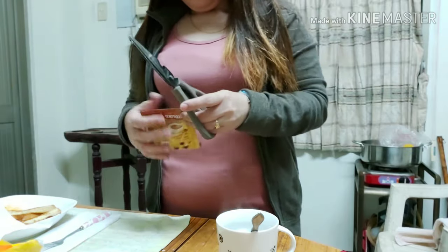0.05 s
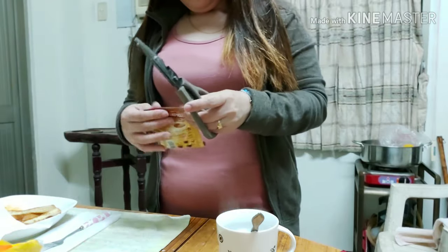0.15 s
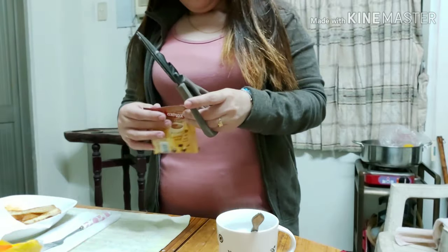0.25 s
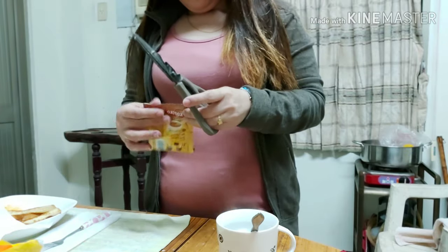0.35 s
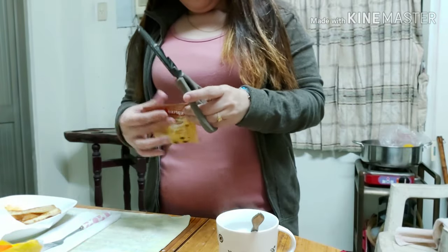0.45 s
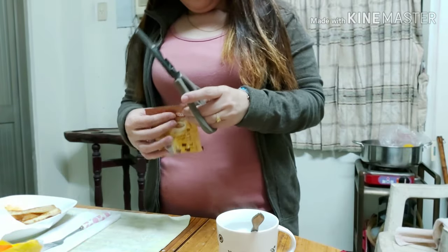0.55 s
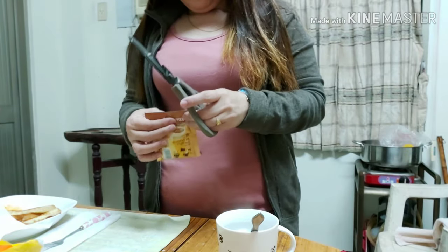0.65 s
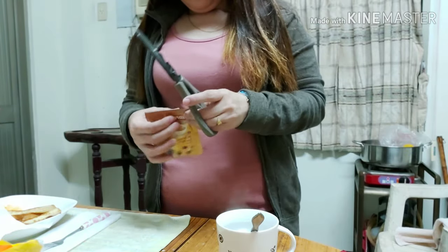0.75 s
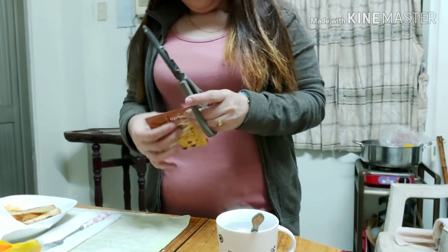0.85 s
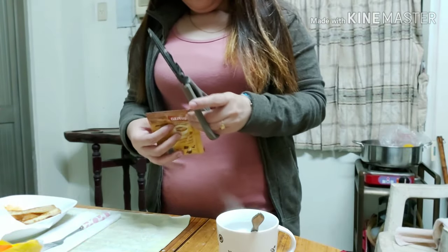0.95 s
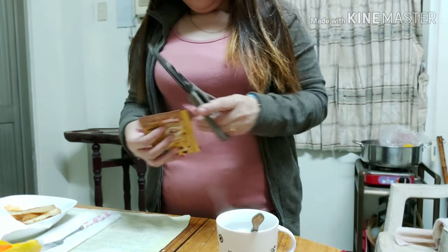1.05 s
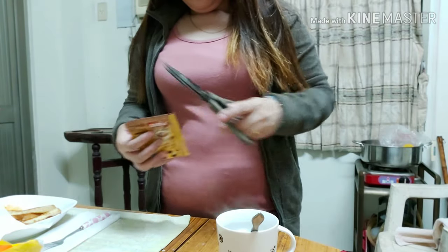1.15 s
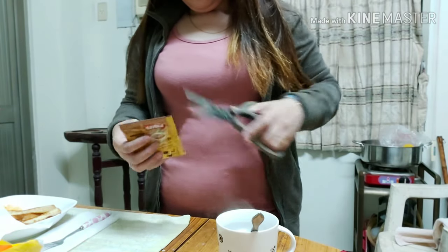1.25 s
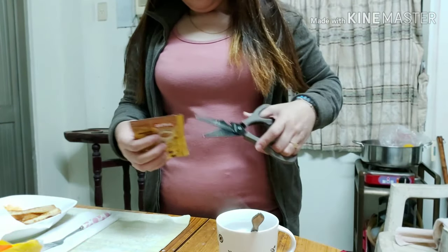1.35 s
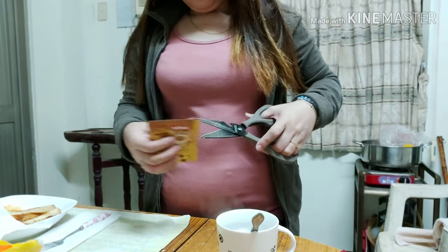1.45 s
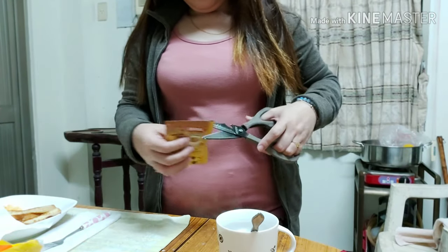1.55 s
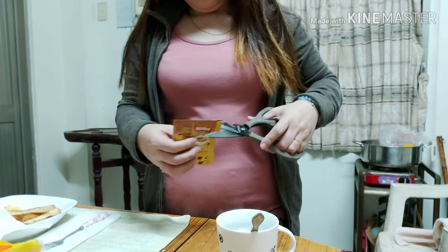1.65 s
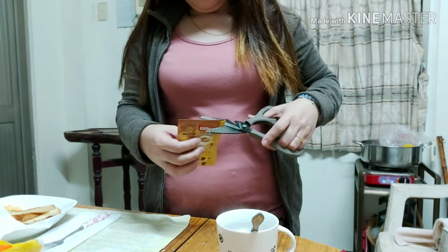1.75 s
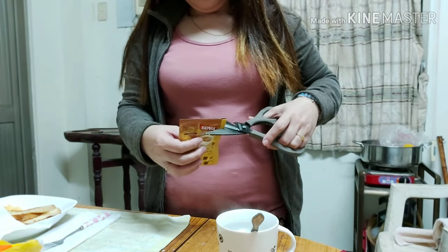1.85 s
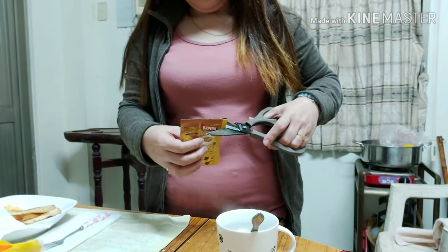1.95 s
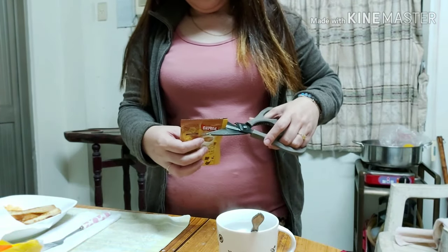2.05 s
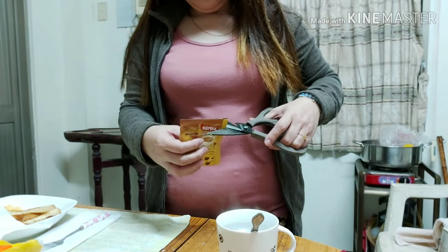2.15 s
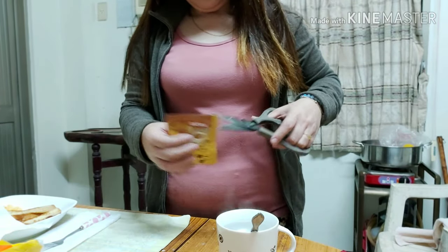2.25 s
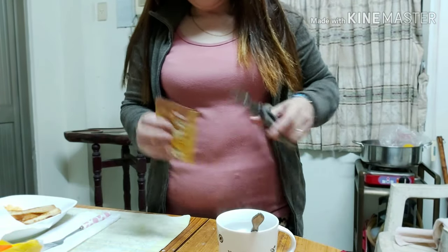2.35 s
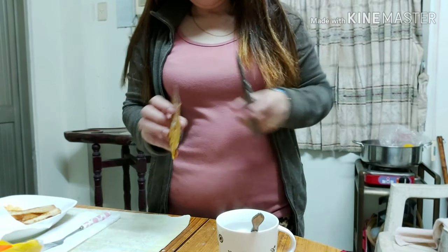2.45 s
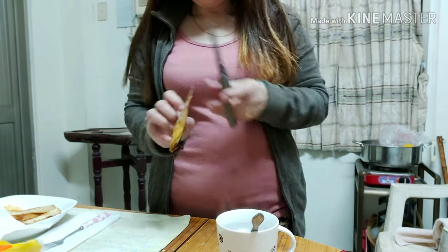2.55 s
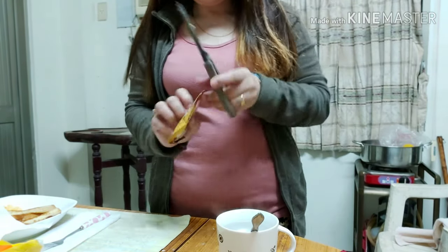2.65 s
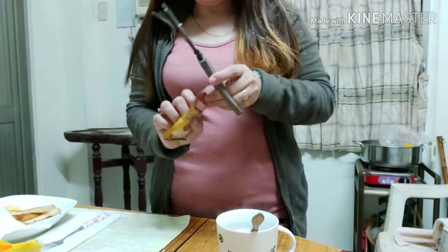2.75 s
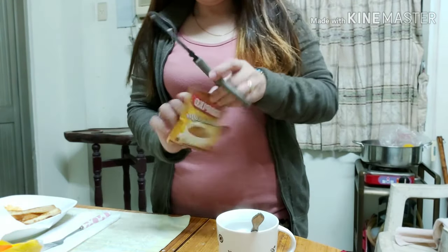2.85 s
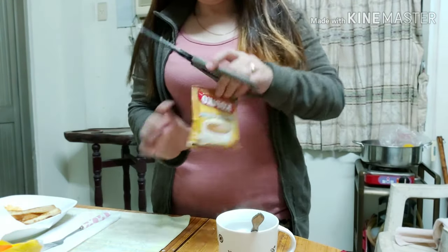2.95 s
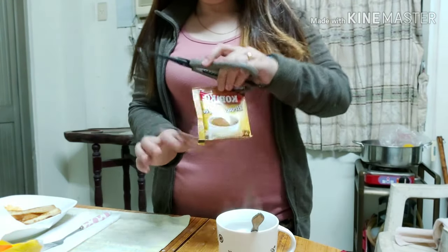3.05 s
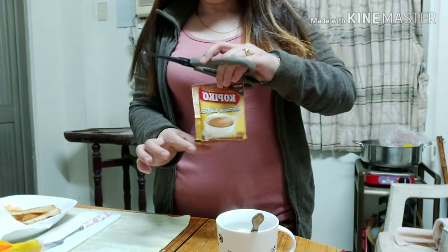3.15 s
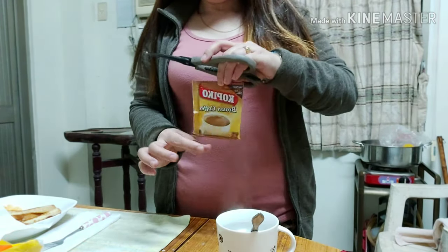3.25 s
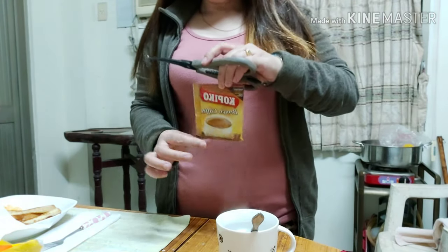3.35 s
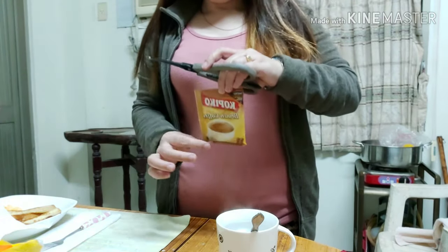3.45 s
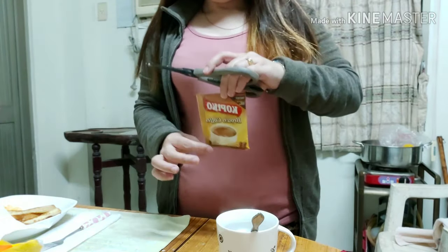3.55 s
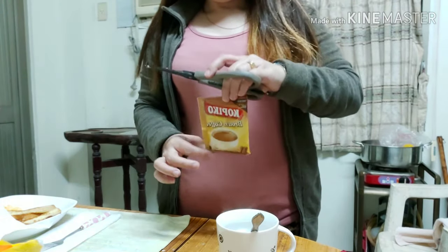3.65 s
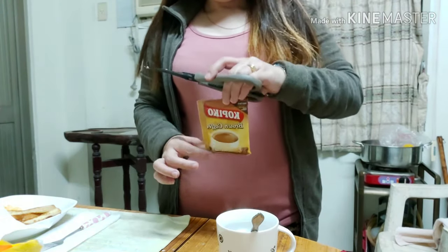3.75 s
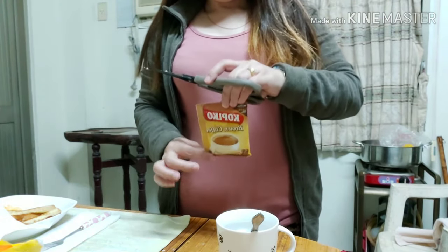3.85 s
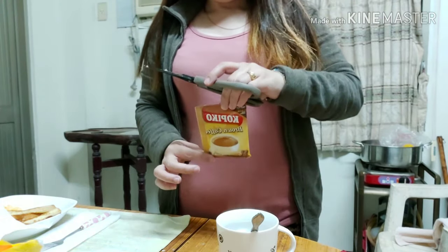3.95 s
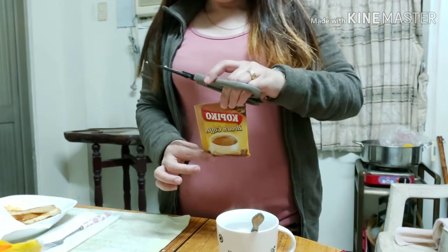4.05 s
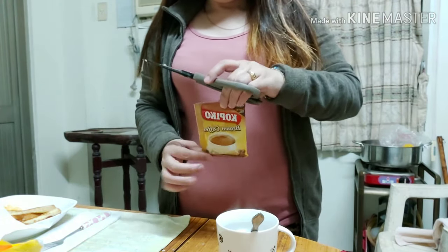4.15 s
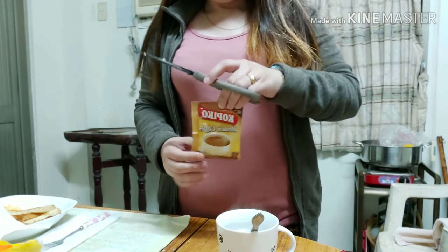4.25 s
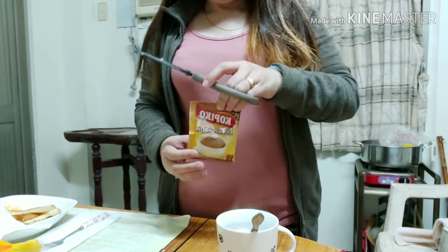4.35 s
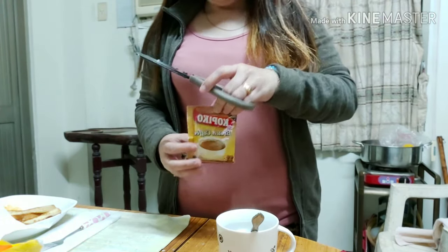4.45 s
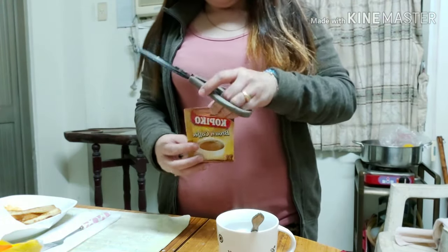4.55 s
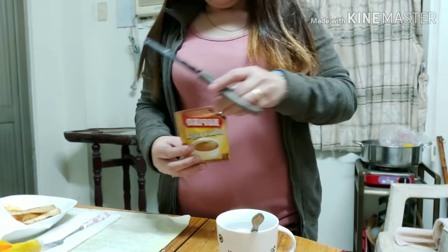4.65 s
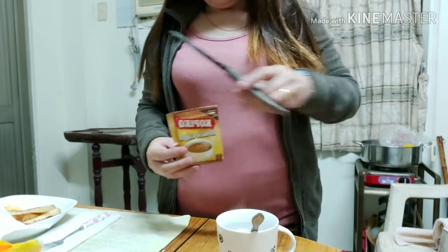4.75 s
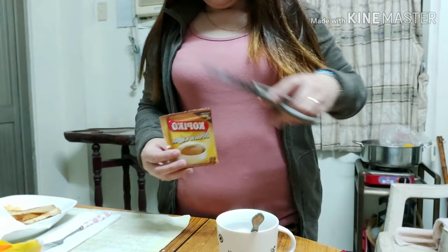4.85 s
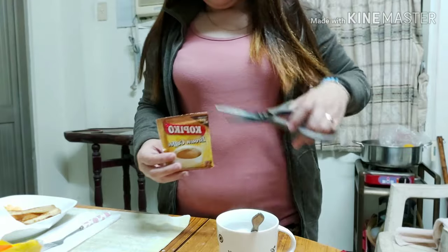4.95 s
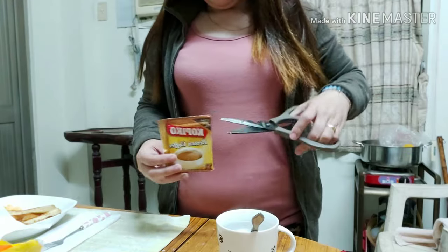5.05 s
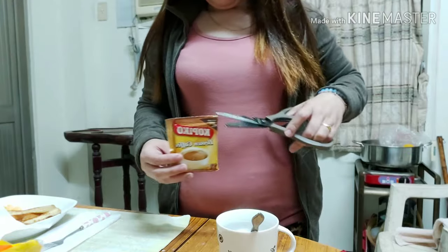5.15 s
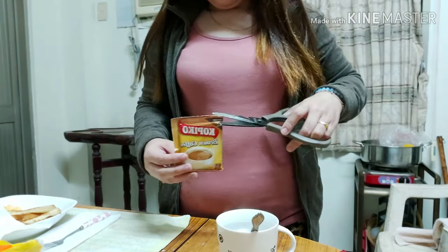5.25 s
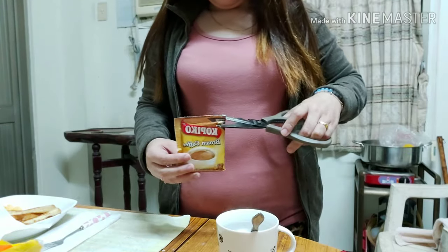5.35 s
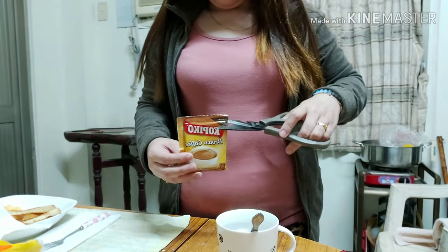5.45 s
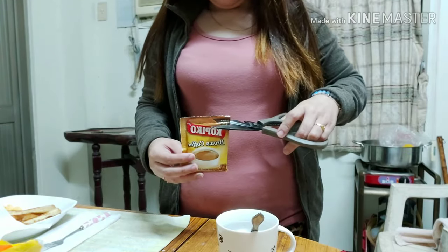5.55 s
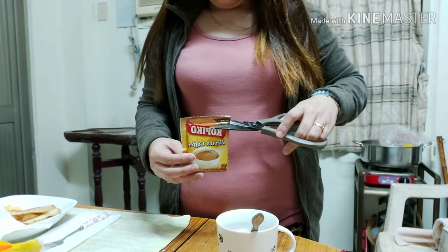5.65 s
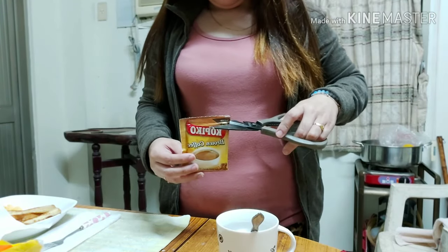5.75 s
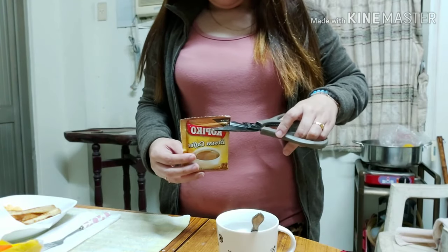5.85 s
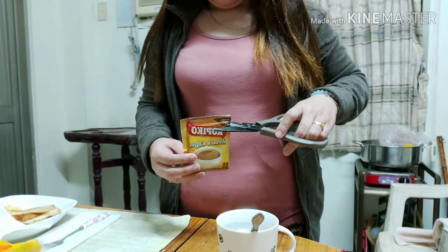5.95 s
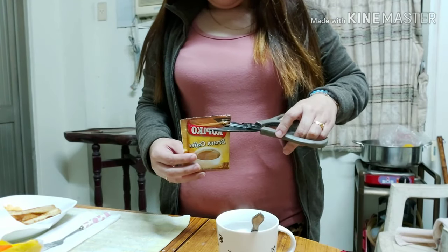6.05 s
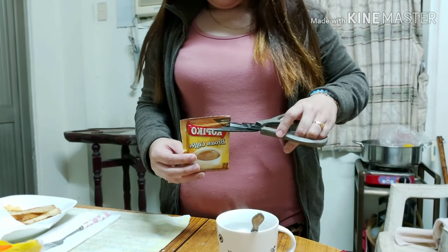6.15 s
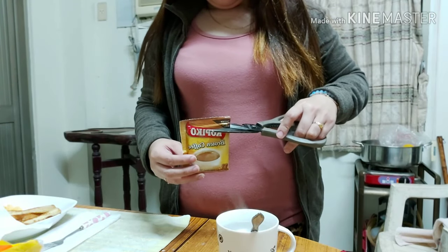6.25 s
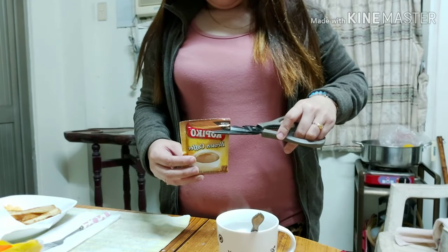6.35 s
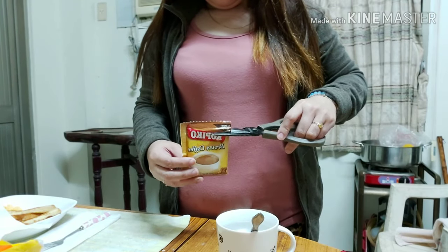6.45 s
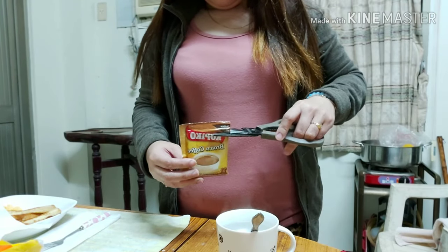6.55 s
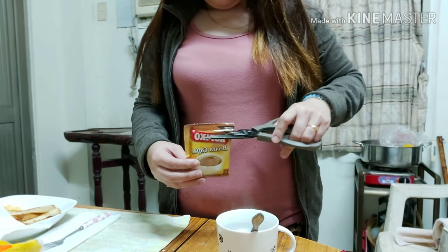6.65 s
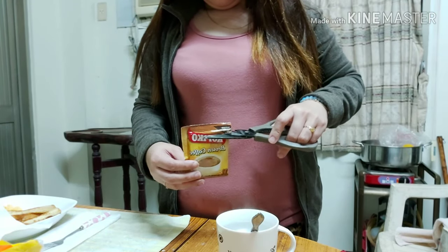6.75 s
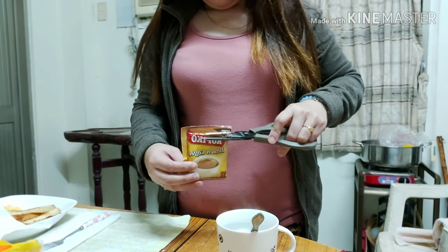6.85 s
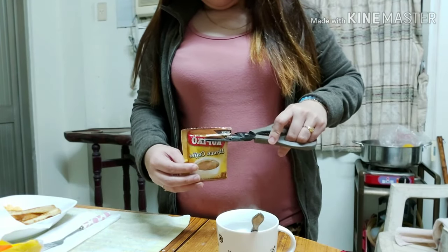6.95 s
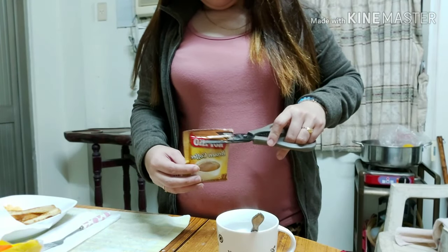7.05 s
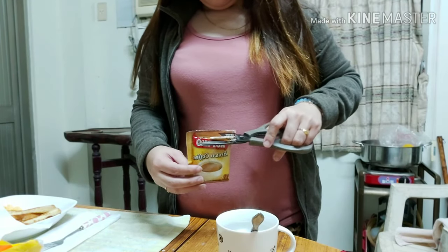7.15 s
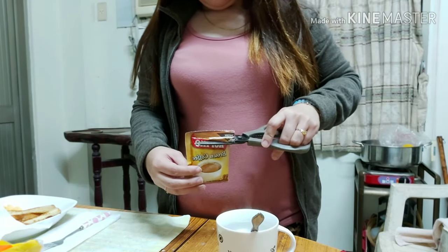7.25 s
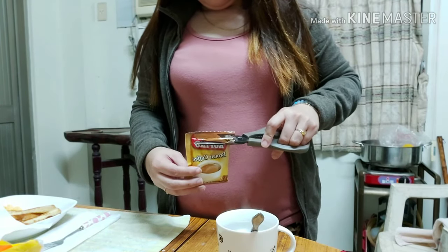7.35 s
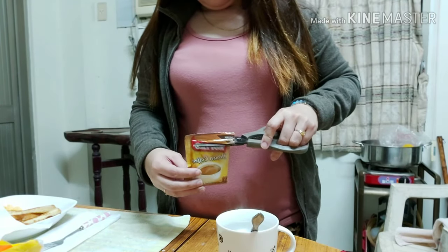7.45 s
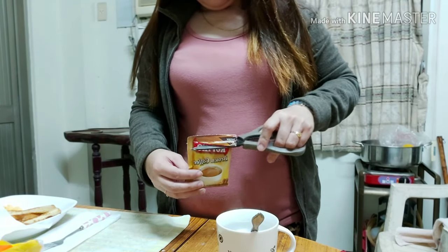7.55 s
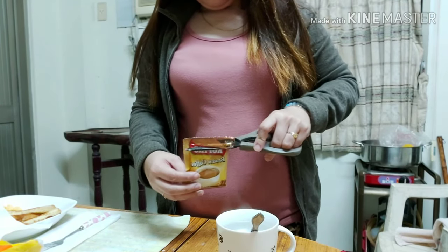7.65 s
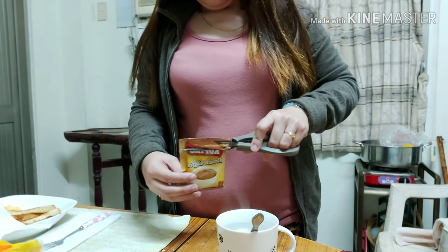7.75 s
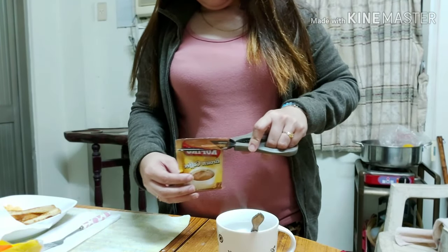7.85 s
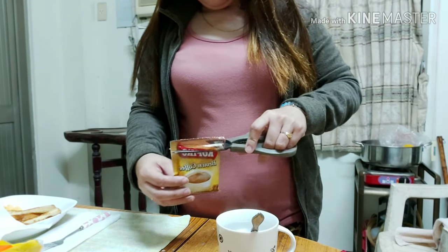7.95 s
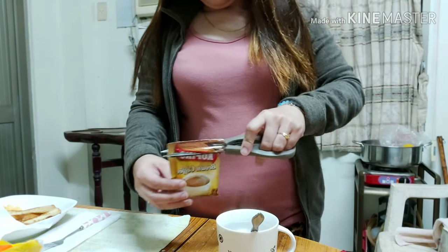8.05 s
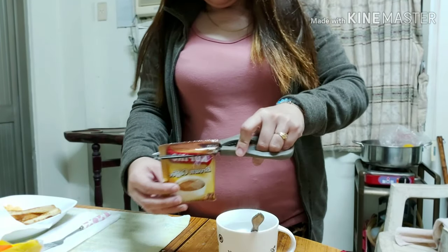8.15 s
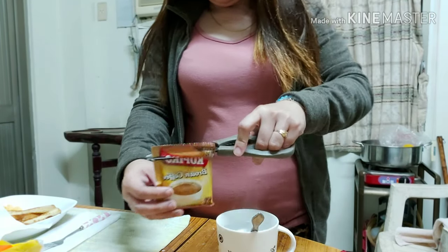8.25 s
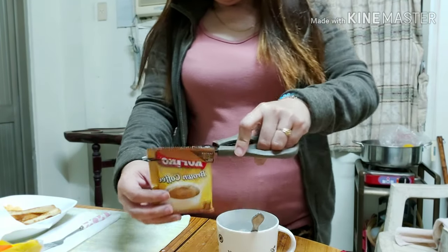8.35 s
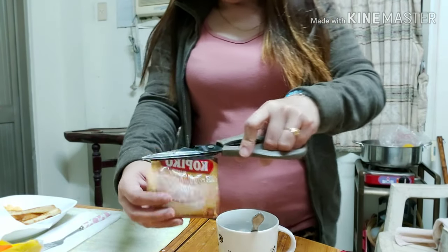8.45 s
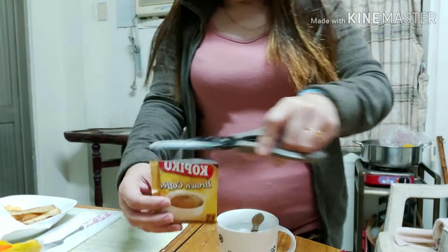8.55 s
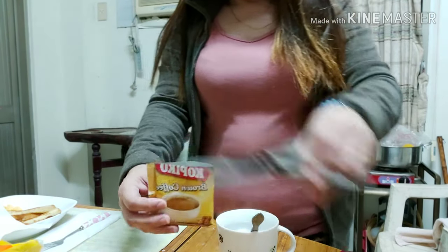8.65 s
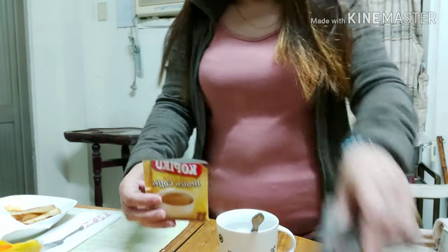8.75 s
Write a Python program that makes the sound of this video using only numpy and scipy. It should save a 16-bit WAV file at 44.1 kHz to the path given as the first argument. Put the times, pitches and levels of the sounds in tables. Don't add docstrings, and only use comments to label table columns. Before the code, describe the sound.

Sharp foil crackles, short pauses, then crisp snipping of a small powder pouch end in a bright scissors clack, with soft rhythmic appliance puffs behind.

```python
import sys
import numpy as np
from scipy import signal
from scipy.io import wavfile
from scipy.ndimage import uniform_filter1d

SR = 44100
rng = np.random.default_rng(int(sys.argv[2]) if len(sys.argv) > 2 else 0)


def dump_mix(stems):
    frames = np.atleast_2d(stems).T
    limited = np.clip(frames, -1, 1)
    pcm = np.round(limited * 32767).astype(np.int16)
    wavfile.write(sys.argv[1], SR, pcm)


def decibels_to_gain(level_db):
    exponent = np.asarray(level_db, float) / 20
    return 10 ** exponent


N = 387373
TIME = np.arange(N) / SR


def evened(x):
    return x / np.sqrt(np.mean(x ** 2) + 1e-20)


def read(points, hz):
    f, value = np.transpose(points)
    return np.interp(np.log(hz + 1), np.log(f + 1), value)


def causal(db):
    return np.exp(np.conj(signal.hilbert(np.log(decibels_to_gain(np.maximum(db, -80))))))


def coloured(x, points):
    hz = abs(np.fft.fftfreq(2 ** 11, 1 / SR))
    taps = np.fft.ifft(causal(read(points, hz))).real[:2 ** 10]
    return signal.oaconvolve(x, taps)[:len(x)]


def add(mix, s, sound):
    part = mix[..., round(s * SR):][..., :sound.shape[-1]]
    part += sound[..., :part.shape[-1]]


def burst(t, rise_s, fall_s):
    return (1 - np.exp(-t / rise_s)) ** 2 * np.exp(-t / fall_s)


# freq_hz, likeness
LIKENESS = [(40, 0.53), (150, 0.79), (300, 0.73), (640, 0.039), (1400, -0.14), (3000, -0.043)]


def second_port(first, other, hz):
    same = np.clip(read(LIKENESS, hz), -1, 1)[:, None]
    return same * first + np.sqrt(1 - same ** 2) * other


def diffuse(shape_db, patchy_db):
    frames, hz = N // 256 + 5, np.fft.rfftfreq(1024, 1 / SR)
    a, b, c, d, patches = rng.standard_normal((frames, 513, 5)).T
    patches = uniform_filter1d(patches, size=10, axis=0)
    patches = evened(uniform_filter1d(patches, size=8, axis=1))
    left = a + 1j * b
    z = np.array([left, second_port(left, c + 1j * d, hz)])
    z *= decibels_to_gain(shape_db(hz)[:, None] + patchy_db * patches)
    return evened(signal.istft(z, nperseg=1024, noverlap=768)[1][:, :N])


# freq_hz, level_db per Hz
HUM_BED = [(25, 4.5), (60, -13), (170, -2.5), (310, -1), (430, -13), (1400, -22.5), (10000, -37),
           (15000, -30.5)]
# freq_hz, width_hz, level_db
HUM_MODES = [(102.4, 9.6, -74.5), (174.5, 14.3, -67.5), (294.1, 9, -73)]


def hum(bed_db=-63, swing=0.45):
    bed = decibels_to_gain(bed_db) * diffuse(lambda hz: read(HUM_BED, hz), patchy_db=1.5)
    for (hz, width_hz, db), chance in zip(HUM_MODES, rng.standard_normal((len(HUM_MODES), 3, N))):
        r, turn = np.exp(-np.pi * width_hz / SR), np.exp(2j * np.pi * hz * TIME)
        drive = (chance[0] + 0.12 * chance[1:]) / turn
        slow = signal.lfilter([1 - r], [1, -2 * r, r * r], drive)
        mode = abs(slow) ** swing * np.exp(1j * np.angle(slow)) * turn
        bed += decibels_to_gain(db) * evened(mode.real)
    return bed


# freq_hz, level_db per Hz
PUFF_AIR = [(500, -29.5), (900, -11.5), (2000, -12.5), (3100, -13.5), (5000, -14), (11000, -11),
            (14800, -9.5), (16000, -21.5)]
# freq_hz, width_hz, lift_db
PUFF_MODES = [(1110, 300, 8.5), (1880, 36, 21), (2163, 140, 16), (3920, 630, 13), (6370, 3460, 12),
              (10000, 310, 3), (13000, 1300, 2), (6290, 500, 4), (3340, 330, -7), (10500, 900, -2)]
# period_share, level_db
STROKE = [(0, -93), (.07, -62), (.15, -58), (.37, -62), (.49, -60.5), (.72, -67), (.9, -75), (1, -72)]
# start_s, strength_db, delay_s
LOAD = [
    (0, 1, 0.029),
    (1.6, -2, 0.064),
    (2.3, -1, 0.027),
    (3.75, 7, 0.0078),
    (4.15, 4, 0.035),
    (4.85, -3, -0.013),
    (5.201, 0.5, 0.0028),
    (5.561, 2, 0.013),
    (5.95, 1.5, -0.0061),
    (8.78, 3, -0.028),
]


def housing_db(hz):
    modes_db = sum(db / (1 + (2 * (hz - f) / width_hz) ** 2) for f, width_hz, db in PUFF_MODES)
    return read(PUFF_AIR, hz) + modes_db


def lowpass(x, cutoff_hz):
    taps = signal.firwin(numtaps=2 ** 6 + 1, cutoff=cutoff_hz, fs=SR)
    return signal.oaconvolve(x, taps[None], "same", axes=1)


def puffs(stroke_s=5.165, period_s=0.3665):
    treble_hz, treble_lead_s = 5050, 0.023
    fizz_hz, fizz_lag_s, gap_share, gap_depth_db = 8200, 0.005, 0.41, -5
    share, db = np.transpose(STROKE)
    s, strength_db, late_s = np.transpose(LOAD)
    phase = (TIME - stroke_s - np.interp(TIME, s, late_s)) / period_s
    air = diffuse(housing_db, patchy_db=-1.0) * decibels_to_gain(np.interp(TIME, s, strength_db))
    body, below = lowpass(air, treble_hz), lowpass(air, fizz_hz)
    body_db = np.interp(phase % 1, share, db)
    treble_db = np.interp((phase + treble_lead_s / period_s) % 1, share, db)
    fizz_db = np.interp((phase - fizz_lag_s / period_s) % 1, share, db)
    fizz_db += gap_depth_db * np.exp(-((phase % 1 - gap_share) / 0.065) ** 2)
    return body * decibels_to_gain(body_db) + (below - body) * decibels_to_gain(treble_db) + (air - below) * decibels_to_gain(fizz_db)


# middle_s, length_s, crackle_db, handling_db
SQUEEZES = [(0.01, 0.079, -48.5, -57), (0.315, 0.2, -47.5, -50.5), (0.512, 0.1, -40.5, -53.5),
            (0.682, 0.09, -30.5, -46.5), (0.902, 0.52, -47.5, -53), (1.1, 0.1, -38, -65),
            (1.314, 0.12, -48, -85), (2.553, 0.086, -44, -68), (2.653, 0.093, -42, -56.5),
            (2.868, 0.19, -36.5, -64), (2.96, 0.21, -41.5, -50.5), (3.415, 0.2, -48, -57),
            (3.484, 0.081, -42, -58), (4.562, 0.31, -65, -63.5), (4.686, 0.12, -48, -65),
            (6.424, 0.14, -57.5, -53), (6.506, 0.23, -43, -63), (6.715, 0.089, -38, -55.5),
            (6.99, 0.23, -44.5, -56), (7.193, 0.064, -45, -47.5), (7.424, 0.097, -50, -53),
            (7.617, 0.1, -49, -58.5), (7.799, 0.17, -39.5, -53), (7.89, .1, -58, -74),
            (8.11, 0.17, -48.5, -59), (8.28, 0.14, -46.5, -60.5), (8.486, 0.058, -44.5, -52),
            (8.758, 0.21, -54, -66)]


def effort_db(column, edge_db=-5.5, release=0.81):
    table, t = np.array(SQUEEZES), TIME[::2 ** 6]
    off = 2 * (t - table[:, :1]) / table[:, 1:2]
    off = np.where(off > 0, off / release, off)
    level_db = table[:, column:column + 1] + edge_db * off ** 2
    power = (decibels_to_gain(level_db) ** 2).sum(0)
    return np.interp(TIME, t, 10 * np.log10(power + 1e-12))


def random_hits(per_s, spread_db, most):
    size = decibels_to_gain(spread_db * np.minimum(rng.exponential(1, N), most))
    return size * (rng.random(N) < per_s / SR)


# freq_hz, level_db per Hz
FOIL = [(530, -22.5), (900, 4.5), (1770, 2), (4200, 4), (6400, -3.5), (12000, -5), (15100, -46),
        (16000, -46)]


def crackle(per_s=350, spread_db=3.0):
    size = random_hits(per_s, spread_db, 1.6)
    kind, t, out = rng.integers(0, 16, N), np.arange(2 ** 8) / SR, np.zeros((2, N))
    for k, chance in enumerate(rng.standard_normal((16, 3, len(t)))):
        patch = np.sin(2 * np.pi * 1500 * 1.13 ** k * t)
        grain = (0.7 * chance[0] + 0.4 * chance[1:] + 0.9 * patch) * burst(t, 0.0003, 0.0012)
        out += signal.oaconvolve((size * (kind == k))[None], grain, axes=1)[:, :N]
    out = np.array([coloured(port, FOIL) for port in out])
    return evened(out) * decibels_to_gain(effort_db(column=2) - 9.0)


# freq_hz, level_db per Hz
DULL = [(150, -46), (250, -20), (295, -1.5), (639, -7), (699, -3), (993, -12.5), (1690, -29.5),
        (2860, -120)]


def handling(per_s=450, spread_db=5.5):
    pressed = random_hits(per_s, spread_db, 1.8)
    drive = evened(pressed * rng.choice([-1, 1], N)) + 0.13 * rng.standard_normal(N)
    return evened(coloured(drive, DULL)) * decibels_to_gain(effort_db(column=3) - 4.5)


def snaps(rows):
    lower_db, taut_hz, taut_width_hz, taut_loss_db = 2, 4290, 430, 14
    soft_db, purity = -23.5, 0.5
    out, t = np.zeros((3, N)), np.arange(2 ** 9) / SR
    hz = abs(np.fft.fftfreq(len(t), 1 / SR))
    cluster = burst(t, 0.00012, 0.0013) * decibels_to_gain(-3 * (t / 0.0035) ** 4)
    chances = rng.standard_normal((len(rows), 3, len(t)))
    for (s, db, ring_hz, treble_db, room_db), chance in zip(rows, chances):
        wander = 0.39 * np.cumsum(chance[0]) * np.sqrt(ring_hz / SR)
        panel = 0.75 * np.sin(2 * np.pi * ring_hz * t + wander)
        noise = decibels_to_gain(purity * min(db - soft_db, 0)) * (0.83 * chance[0] + 1.22 * chance[1:])
        slip = np.fft.fft((panel + noise) * cluster)
        low_db = lower_db - taut_loss_db / (1 + ((ring_hz - taut_hz) / taut_width_hz) ** 4)
        broad_db = read([(300, low_db - 13.0), (1250, low_db - 10.0), (1650, low_db), (2300, low_db),
                         (3000, 0.87), (5200, 0.35), (6500, treble_db + 2.0),
                         (15000, 1.59 * treble_db - 3.0)], hz)
        hump_db = room_db + 3.3 / (1 + ((hz - ring_hz) / (0.04 * ring_hz)) ** 2)
        flat = np.linalg.norm(slip[0]) / np.sqrt(len(t))
        every_way = flat * decibels_to_gain(hump_db) * np.exp(1j * np.angle(slip[0]))
        sound = np.fft.ifft(np.vstack([slip, every_way]) * causal(broad_db)).real
        add(out, s - 0.0003, decibels_to_gain(db + 0.5) * sound / abs(sound[:2]).max())
    return out


# start_s, peak_db, ring_hz,
# treble_db, room_db
SLIPS = [(0.0238, -49, 2560, 2, 0), (0.2402, -53, 1740, -2, -2), (0.281, -35, 1690, 0, -5),
         (0.2957, -34, 6500, -7, -2), (0.3405, -39, 6950, 5, -2), (0.3964, -37, 2900, -7, 2),
         (0.4653, -35, 2570, -3, -2), (0.4973, -33, 2760, -1, -2), (0.5162, -34, 6200, 3, -8),
         (0.5206, -27, 1700, -2, -7), (0.609, -33, 1980, -3, -7), (0.6444, -32, 1590, -15, 11),
         (0.711, -29, 2730, -10, -4), (0.774, -34, 7500, 1, -2), (0.7787, -31, 2580, -13, -2),
         (0.897, -22, 3120, 2.5, -2), (0.9044, -34, 3430, -5, -6), (0.9278, -36, 8500, 5, -2),
         (1.017, -37, 1930, -8, -2), (1.0273, -30.5, 1960, -3, -2), (1.041, -38, 2010, -6, -4),
         (1.177, -37, 2780, -6, -4), (1.299, -58, 2170, -4, 3), (1.3219, -45, 2120, 1, 2),
         (2.383, -41.5, 4200, -16, 8), (2.489, -34, 5470, -2, 1), (2.5162, -42, 2470, -2, -4),
         (2.5477, -44, 2440, -8, -2), (2.569, -41, 2120, -11, 0), (2.9817, -28, 1650, -11, 0.5),
         (3.0374, -40, 2070, 0, -2), (3.2774, -51, 2120, -8, -4), (3.3175, -48, 2000, -8, -3),
         (3.6325, -27, 4350, -13, -16),
         (4.459, -40, 6400, 2.5, 12.5), (4.5125, -53, 1750, -5, -2), (6.255, -44.5, 2780, -6, -2),
         (6.5855, -31, 2400, -3, -2), (6.6433, -40, 1780, -6, -8), (6.708, -35, 2110, -4, -6),
         (6.8404, -40, 4800, -8, -4), (6.8944, -31, 2560, 2, 3), (6.934, -36, 2130, -4, 1),
         (6.962, -32, 2300, -5, 1), (6.9944, -42, 6000, 0, -2), (7.3532, -49, 7100, 2, -12),
         (7.4166, -29, 4300, -2, 3), (7.475, -38, 7800, 8, -2), (7.6625, -41, 2230, -2, 13.5),
         (7.7395, -45, 7500, -4, -2), (7.828, -28, 10400, -5, -4), (7.9934, -44, 7600, 0, -2),
         (8.248, -32, 7000, -1, -7), (8.314, -37, 5000, -6, -2), (4.3466, -31, 4900, -10.5, -20),
         (6.503, -20.5, 1990, -15, -4), (8.468, -34, 2530, -5, 3), (8.7005, -26, 11250, 1, -8),
         (0.065, -39, 7050, -4, -10), (0.3353, -29, 6500, 2, -6), (0.6114, -41, 6500, 1, -6),
          (0.66, -18.5, 8260, 6, -4), (0.785, -28, 7000, 10, -8), (0.8573, -33.5, 7000, 5.5, -6),
          (0.8398, -33, 2200, -9, -3), (1.011, -34, 7000, 5, -6), (1.0404, -34, 7200, 5, -6),
          (1.0519, -32, 7050, -4, -6), (2.5231, -39, 6500, -2, -4), (2.6313, -38, 2300, -6, -4),
          (2.8485, -32, 2200, -14, -8), (7.145, -27, 2260, -9.5, -7), (7.5692, -26, 7400, 6, -9),
          (7.6384, -44, 3800, -6.5, -4), (7.759, -38, 12000, 4, -4), (8.1376, -34, 6230, 0, -6),
          (8.071, -48, 2520, -3.5, -4), (8.5025, -40, 2300, -8, 0)]


def small_slips():
    return snaps(SLIPS)


# start_s, peak_db, ring_hz, treble_db, room_db
TURNING = [(0.0637, -34.5, 2530, -26, 10), (0.1255, -34, 2760, -6.5, 8.5), (0.2514, -27, 6450, 3.5, 1),
           (0.273, -25, 7300, 1.5, 4), (0.3316, -32.5, 1670, -3, 13.5), (0.3664, -27, 6800, 5.5, -17.5),
           (0.3746, -22, 1580, -3.5, -10), (0.4508, -33, 2510, -10, 11), (0.4706, -32, 2430, 4.5, 3),
           (0.5087, -30.5, 1500, -2.5, 12), (0.5185, -17, 1880, 8.5, -30.5), (0.6225, -16.5, 8230, 3.5, -4),
           (0.6506, -8, 1910, 7, -11), (0.6576, -11.5, 6450, 5, 1.5), (0.786, -28, 2630, -13.5, 13),
           (0.7917, -16.5, 2680, 1.5, -14), (0.8159, -21, 1930, 3, 2), (0.8956, -24, 3670, -5.5, 8),
           (1.0104, -33.5, 2000, -9, 10.5), (1.0595, -21, 1950, -0.5, -3), (1.087, -29, 2580, -13, -6),
           (1.1056, -14.5, 2550, -2, 2), (1.2517, -19.5, 7060, 7, -2), (1.5003, -31.5, 6600, -3.5, 7)]
# start_s, peak_db, ring_hz, treble_db, room_db
FLIPPING = [(1.8391, -20, 3790, -3.5, 7.5), (2.4796, -39, 4300, -3, 13), (2.6224, -15.5, 7600, 3.5, 1),
            (2.756, -20, 2800, -1.5, 6), (2.779, -18, 7000, 2, -2), (2.839, -24.5, 7100, 1.5, 5.5),
            (2.847, -13.5, 11460, 14, -17), (2.8826, -10.5, 3370, 1, 0.5), (2.955, -22.5, 1420, -6, 2.5),
            (2.988, -26.5, 3600, -3, -6.5), (3.0926, -33.5, 1470, -10, 1.5), (3.2311, -37, 6850, -5, -4),
            (3.324, -20, 5500, -2, 7), (3.3294, -15, 2080, -3.5, -1), (3.3551, -20, 3500, -5, 4),
            (3.3635, -15.5, 3920, -10.5, -13), (3.4436, -14.5, 3860, -11, 0.5), (3.45, -12, 3730, -1, -10),
            (3.632, -22.5, 1850, -1.5, 2.5), (4.3452, -21, 4060, -7.5, 0.5), (4.5455, -22, 2380, -1.5, 0.5),
            (4.6156, -21, 2130, -2, 3), (4.624, -27, 2070, -5, -5), (4.6789, -40, 2100, -6, -9)]
# start_s, peak_db, ring_hz, treble_db, room_db
CUTTING = [(6.197, -32.5, 3870, -8, 1.5), (6.25, -36.5, 3950, -6, 4), (6.327, -22.5, 7960, 4.5, 5),
           (6.365, -34, 1800, -1.5, 3.5), (6.398, -16, 1780, 1, 1.5), (6.444, -11.5, 1780, -1.5, 1.5),
           (6.4779, -21.5, 2520, -8.5, -12), (6.503, -9.5, 4310, -2, -1.5), (6.514, -22, 2530, -12, 0.5),
           (6.6718, -22.5, 1720, -2.5, -2), (6.6811, -27, 2820, -4, -8), (6.6988, -27.5, 1880, 3.5, 18.5),
           (6.71, -15, 2270, 3, -16), (6.795, -24.5, 7440, -1.5, -3), (6.86, -17.5, 4300, -3.5, -0.5),
           (6.923, -20, 3660, -1, 3.5), (6.9862, -22, 3400, -2.5, -1), (7.0448, -14.5, 4050, 2.5, 2),
           (7.0877, -16.5, 3850, 1, 1), (7.145, -17, 7100, 10, -0.5), (7.1515, -23.5, 2550, -10, 5),
           (7.1974, -25, 2890, -1, 0)]
# start_s, peak_db, ring_hz, treble_db, room_db
FINISHING = [(7.364, -22.5, 2670, -0.5, 4.5), (7.412, -27.5, 2790, 14, 4.5), (7.5678, -30, 7620, 1, 9.5),
             (7.7327, -33.5, 7500, 2, 13.5), (7.7735, -30, 12400, 12, 5), (7.7833, -10.5, 3310, -3, 0.5),
             (8.0001, -20, 6850, 4, 3.5), (8.1575, -33.5, 3060, 2, 6), (8.2535, -31, 2680, 2.5, 6.5),
             (8.27, -29.5, 7200, 3, -12), (8.2891, -37, 2210, 1.5, -7), (8.318, -41, 7140, 1, -17),
             (8.4494, -29, 5170, -1.5, 7), (8.458, -25, 8640, 0, -10), (8.602, -38.5, 5400, -1, -14)]
# start_s, peak_db, ring_hz, treble_db, room_db
TICKS = [
    (0.1338, -32.5, 7860, -10, -7),
    (0.228, -39, 7340, -2, -7),
    (1.5204, -34, 7400, 5, -2.5),
    (2.386, -43, 5570, -1.5, 4.5),
    (3.003, -25, 3550, -4, -16),
    (4.523, -44, 2330, -10, 1),
]


def creases():
    return snaps([*TURNING, *FLIPPING, *CUTTING, *FINISHING, *TICKS])


def pouch_rings(table, t60_s):
    out, t = np.zeros(N), np.arange(2 ** 12) / SR
    for (s, db, hz), chance in zip(table, rng.standard_normal((len(table), len(t)))):
        rough = evened(uniform_filter1d(chance, size=150))
        turns = np.cumsum(hz * (1 + 0.12 * rough)) / SR
        ring = np.sin(2 * np.pi * turns) * burst(t, t60_s / 40, t60_s / np.log(1000))
        add(out, s, decibels_to_gain(db + 2.0) * ring)
    return out


# start_s, peak_db, ring_hz
POPS = [(0.223, -50, 353), (0.23, -52, 450), (0.395, -44, 713), (0.45, -44, 597), (0.486, -48, 684),
        (0.508, -44, 611), (0.521, -40.5, 600), (0.62, -39, 716), (0.658, -34.5, 681), (0.76, -46, 355),
        (0.792, -40, 536), (0.951, -42, 700), (1.013, -41, 690), (1.064, -42, 710), (1.144, -48, 740),
        (2.621, -41.5, 960), (2.846, -38, 1080), (3.363, -40, 596), (4.613, -41.5, 600), (4.681, -47, 353),
        (6.362, -40, 433), (6.454, -48, 813), (6.619, -48, 810), (6.805, -46, 355), (7.207, -38, 409),
        (7.414, -40, 423), (7.475, -43, 692), (8.255, -45, 490), (8.288, -45.5, 476)]


def finger_pops():
    return pouch_rings(POPS, t60_s=0.017)


# start_s, peak_db, ring_hz
THUDS = [(0.261, -47, 570), (0.27, -38.5, 630), (0.373, -49, 501), (0.648, -33.5, 710), (0.708, -41, 506),
         (0.838, -40, 640), (1.039, -36, 660), (1.103, -36.5, 860), (2.755, -43.5, 810),
         (2.882, -36.5, 318), (2.955, -39, 423), (2.979, -31.5, 480), (3.321, -40.5, 432),
         (3.354, -39, 353), (3.449, -38, 327), (6.442, -45, 725), (6.71, -37.5, 494), (6.96, -41, 437),
         (6.985, -42.5, 706), (7.15, -41, 385), (7.7825, -32, 810), (8.685, -42.5, 322)]


def thuds():
    return pouch_rings(THUDS, t60_s=0.025)


# start_s, peak_db, ring_hz
HOLLOW = [
    (4.714, -46, 480),
    (4.732, -49, 475),
    (8.447, -41, 420),
    (8.466, -44, 500),
]


def hollow_knocks():
    return pouch_rings(HOLLOW, t60_s=0.054)


# start_s, peak_db, ring_hz, treble_db, room_db
CLACK = [
    (8.671, -13, 11660, 6.6, -1),
    (8.6857, -12.5, 6640, 4.8, 0.9),
]


def scissors_clack():
    return snaps(CLACK)


# freq_hz, t60_s
KITCHEN = [(200, 0.47), (800, 0.45), (2000, 0.63), (5500, 0.53), (12000, 0.55)]
# delay_s, level_db
WALLS = [
    (.0035, -24),
    (.0078, -18),
    (.0118, -17),
]


def kitchen():
    at = np.arange(340, SR - 20, 20) + rng.integers(0, 20, (2, (SR - 341) // 20))
    taps = np.zeros((2, SR))
    np.put_along_axis(taps, at, rng.choice([-1., 1.], at.shape), 1)
    hz, t, z = signal.stft(taps, SR, nperseg=256)
    z[1] = second_port(z[0], z[1], hz)
    z *= decibels_to_gain(-60 * t / read(KITCHEN, hz)[:, None])
    tail = signal.istft(z, SR, nperseg=256)[1][:, :SR]
    tail *= decibels_to_gain(-4.0) / np.linalg.norm(tail[0])
    for s, db in WALLS:
        tail[[0, 1], round(s * SR) + rng.integers(-12, 12, 2)] += decibels_to_gain(db)
    return tail


def scene():
    appliance = hum() + puffs()
    rustle = crackle() + handling() + finger_pops() + thuds() + hollow_knocks()
    left, right, into_room = small_slips() + creases() + scissors_clack()
    direct = np.array([left + rustle[0], np.roll(right + rustle[1], 4)])
    reverb = signal.fftconvolve((into_room + rustle[0])[None], kitchen(), axes=1)[:, :N]
    return direct + reverb + appliance


def suppressed(dry):
    power_db = 10 * np.log10(abs(uniform_filter1d((dry ** 2).mean(0), size=900)) + 1e-12)
    fall_db = TIME * 112.0
    held_db = np.maximum.accumulate(power_db + fall_db) - fall_db
    gain_db = np.clip(0.31 * (held_db + 49.0), -4.5, 0)
    return dry * decibels_to_gain(uniform_filter1d(gain_db, size=400))


# freq_hz, gain_db
PORT = [(20, -19.5), (70, 1), (14000, -0.5), (15000, -9), (15700, 8.5), (16800, -50.5)]


def microphone(sound):
    return np.array([coloured(port, PORT) for port in sound])


def top_cut(x):
    return signal.sosfilt(signal.butter(12, 16640, fs=SR, output="sos"), x)


def record(dry):
    mix = microphone(suppressed(dry))
    return top_cut(mix)


dry = scene()
out = record(dry)
dump_mix(out)
```